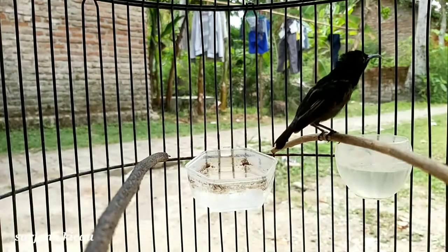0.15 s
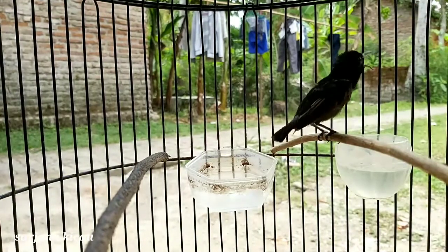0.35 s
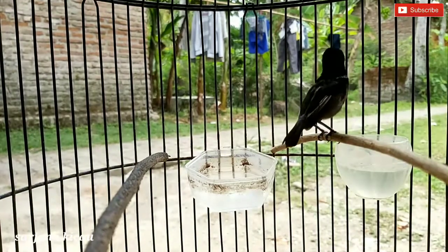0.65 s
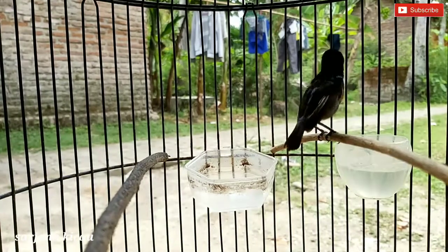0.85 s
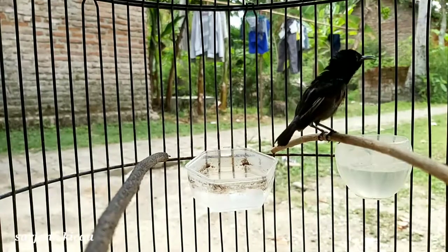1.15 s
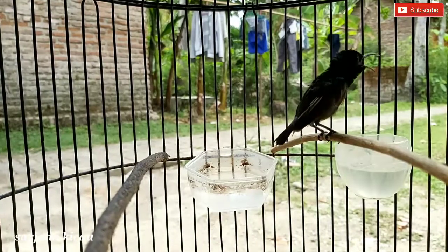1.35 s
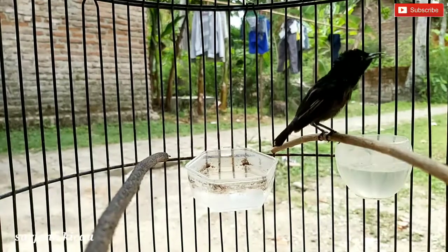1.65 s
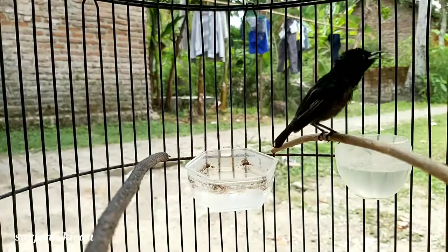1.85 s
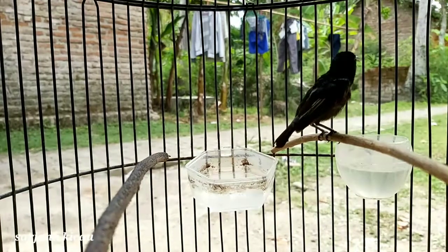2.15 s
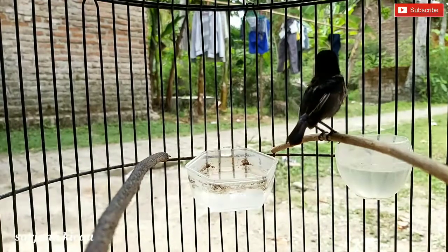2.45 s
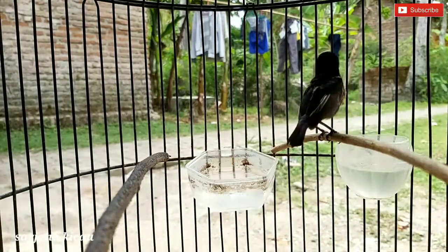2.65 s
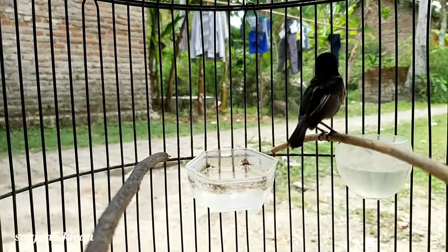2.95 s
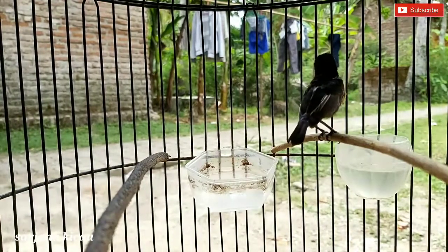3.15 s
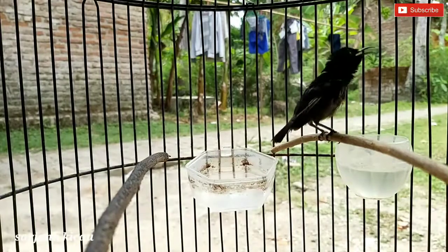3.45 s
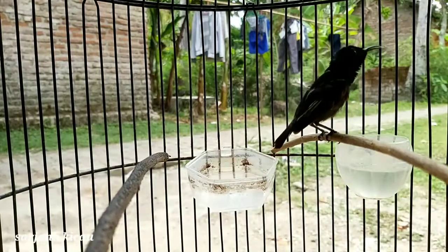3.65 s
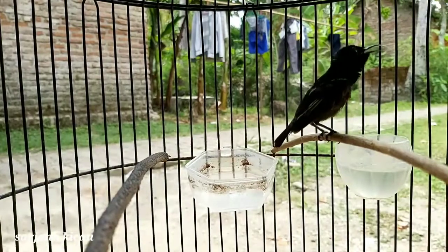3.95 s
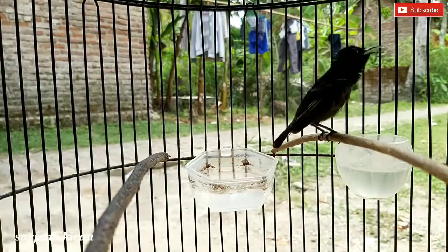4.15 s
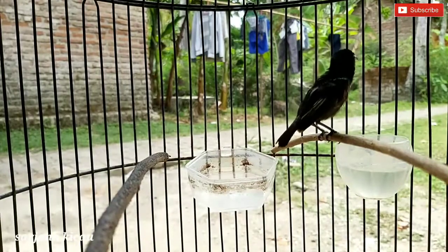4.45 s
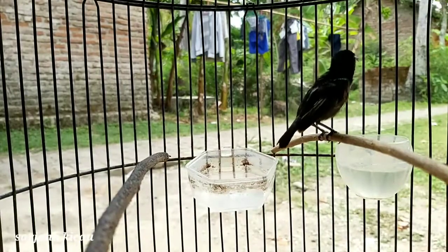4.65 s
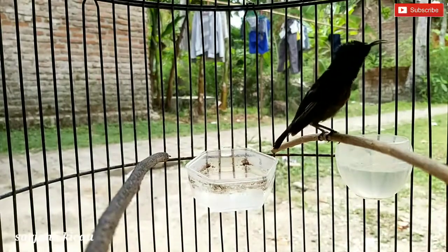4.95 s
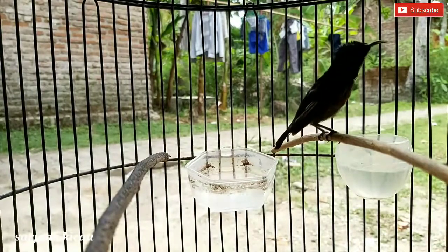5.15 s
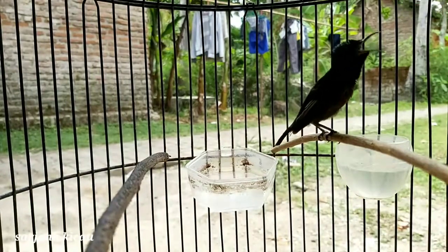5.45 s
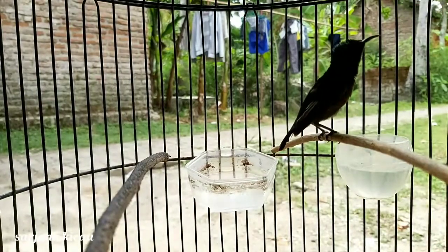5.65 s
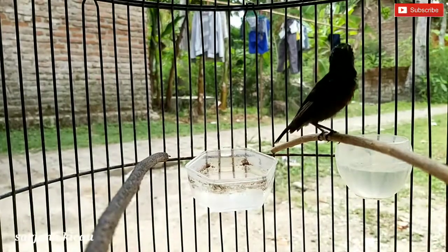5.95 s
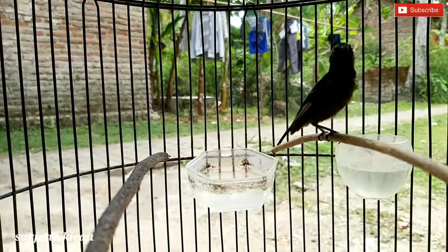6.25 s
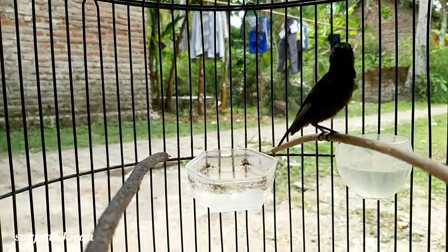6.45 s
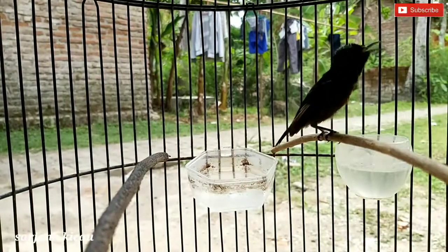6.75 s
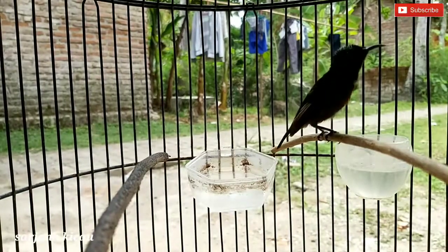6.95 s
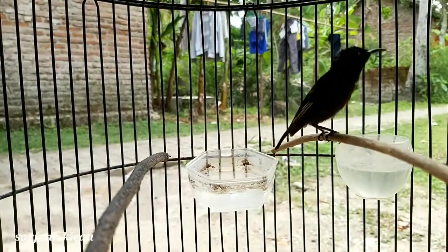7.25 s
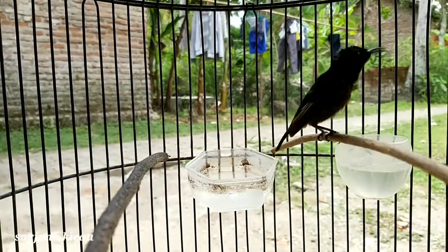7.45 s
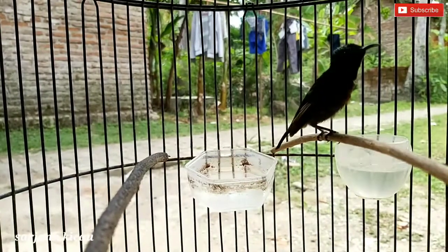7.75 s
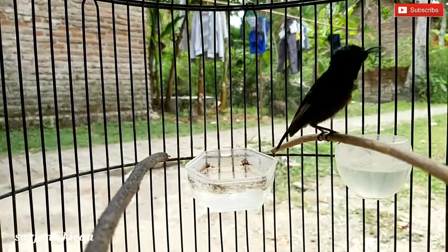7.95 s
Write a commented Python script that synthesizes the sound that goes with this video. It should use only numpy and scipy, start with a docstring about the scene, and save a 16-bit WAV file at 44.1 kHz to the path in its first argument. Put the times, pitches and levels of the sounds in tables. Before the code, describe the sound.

A small caged bird sings close to the microphone in a quiet yard. It gives a run of short, sharp, high chirps, breaks into a long rapid trill of falling notes, then returns to more widely spaced chirps. A soft low thud comes with most chirps, and the song has a slight echo. A faint low hum and very faint distant birds lie behind it.

```python
"""Caged bird in a yard

A small bird sings close to a two-port microphone beside a brick wall: single steady whistles, a long
trill of falling notes, more whistles, one last falling note. A soft tick and thud go with each whistle.
Cage, wall and trees echo the song. Behind it: a wavering low hum, rumble, rustle, hiss, far chirps."""
import sys
import numpy as np
from scipy import signal
from scipy.io import wavfile
from scipy.ndimage import uniform_filter1d, minimum_filter1d

SR = 44100
rng = np.random.default_rng(int(sys.argv[2]) if len(sys.argv) > 2 else 0)


def dump(signal):
    """Clip the signal to [-1, 1] and save it as 16-bit WAV at the path in sys.argv[1]."""
    limited = np.clip(np.atleast_2d(signal).T, -1, 1)
    pcm = np.round(limited * 32767).astype(np.int16)
    wavfile.write(sys.argv[1], SR, pcm)


N = 358091

# whistles: (start [s], length [s], pitch [Hz], left [dB], right [dB], left lag [us],
# relative tick [dB], relative thud [dB])
WHISTLES = [(-0.12, 0.053, 6270, -5.5, -6.5, 114, -48, -34),
            (0.3917, 0.054, 6280, -10, -7, 37, -52.5, -34.5), (0.7882, 0.043, 6310, -7.5, -6, 95, -53, -33),
            (1.12, 0.054, 6234, -7.5, -11.5, 73, -72, -48),
            (1.3939, 0.049, 6344, -11, -6.5, 43, -79, -36.5),
            (1.653, 0.046, 6310, -7.5, -6, 32, -56, -33.5),
            (1.9232, 0.051, 6345, -10.5, -7.5, 81.4, -61.5, -32),
            (2.2298, 0.042, 3833, -17.5, -18, 63, -80, -70),
            (2.5281, 0.047, 6263, -7.5, -13, 93, -59.5, -46),
            (5.485, .049, 6210, -11, -6.5, 53, -46, -41.5), (5.8984, 0.045, 6206, -9.5, -6, 57, -50, -42),
            (6.7616, .05, 6270, -5, -7.5, 46, -50.5, -35.5),
            (7.1547, 0.043, 6290, -9.5, -6, 39.4, -43, -37), (7.536, 0.048, 6296, -10.5, -7, 40, -69, -33)]
# octave of a full-scale whistle, rows left and right: (level [dB])
OCTAVE_DB = [
    [-20.5],
    [-7],
]
# echoes off cage floor, cups, ground: (left delay [ms], right delay [ms], left [dB], right [dB])
NEAR_ECHOES = [(1.6, 3.1, -12.5, -5.5), (4.7, 8.3, -20, -14.5), (8.9, 4.6, -20, -14.5)]
# diffuse tails: (t60 [s], level [dB], low-pass [Hz])
YARD_TAILS = [(0.13, -13, 12000), (.4, -21, 5000)]
# hum envelope: (time [s], level [dB])
HUM_LEVELS = [(0.0, -47.5), (0.41, -65.5), (0.65, -54), (0.95, -64), (1.79, -58), (2.17, -70), (2.53, -53),
              (2.89, -68.5), (3.57, -52), (4.27, -56), (5.15, -64.5), (5.9, -56), (6.65, -63.5),
              (8.12, -59.5)]
# hum resonances: (centre [Hz], width [Hz], relative level [dB])
HUM_MODES = [(100.6, 14, 3), (152.6, 8.9, -13.5), (286.6, 39, -16.5)]
# yard noise envelopes: (time [s], relative rumble [dB], relative rustle [dB])
AIR_LEVELS = [(0.0, -67, -77.5), (0.54, -72.5, -81.5), (3.19, -74.5, -83), (3.48, -68.5, -74.5),
              (6.85, -72.5, -85.5), (8.12, -72.5, -84.5)]
# noise spectra: (frequency [Hz], relative density [dB])
RUMBLE_SPECTRUM = [(15, -51), (25, -15.5), (102, -8), (125, -17.5), (188, -21), (274, -19.5), (800, -54),
                   (1040, -85), (1760, -120)]
RUSTLE_SPECTRUM = [(400, -6), (900, -10), (1600, -9), (2600, -15), (3600, -32)]
HISS_SPECTRUM = [(2000, -12.5), (3200, -7), (4300, -6.5), (5400, -9.5), (7200, -0.5), (11000, -17.5),
                 (16000, -27.5)]
# noise likeness between ports: (frequency [Hz], correlation [ratio])
CORRELATION = [(60, 1), (240, 0.071), (950, 0.015), (3770, 0.13), (15000, 0.39)]
# noise balance: (frequency [Hz], left minus right [dB])
BALANCE = [(60, 11.5), (120, -7.5), (300, -2), (1000, 0.5)]
# far trills: (start [s], end [s], first gap [s], steady gap [s])
FAR_TRILLS = [(.07, 1.6, .0845, .0845), (2.46, 5.1, .175, .086), (5.8, 8.1, .32, .0858)]
# one per far trill: (level [dB])
FAR_DB = [-69.5, -70, -68.5]
# bands of a far chirp: (centre [Hz], width [Hz], delay [s], t60 [s], relative level [dB])
FAR_BANDS = [(6830, 140, -.008, .15, -3), (4330, 520, 0, .42, 0), (6830, 140, .047, .15, -4)]
# faint swells: (start [s], length [s], centre [Hz], width [Hz], level [dB])
SWELLS = [(5.3, .25, 2000, 50, -78), (.15, .14, 2250, 60, -76), (.14, .15, 3800, 6800, -66),
          (.44, .13, 2000, 3200, -68), (6.553, .11, 4200, 900, -62)]
# trill notes: (mid-fall [s], lead-in [s], top pitch [Hz], top left [dB], top right [dB])
TRILL_NOTES = [(3.1084, 0.021, 5324, -16, -18), (3.181, 0.016, 5366, -10.5, -15.5),
               (3.261, 0.021, 5340, -13, -13), (3.3436, 0.022, 5360, -11.5, -12.5),
               (3.4285, .02, 5350, -16.5, -19), (3.5115, 0.025, 5450, -10, -10.5),
               (3.596, 0.02, 5330, -9.5, -5), (3.6836, .022, 5470, -15.5, -3.5),
               (3.7722, 0.021, 5590, -28, -5), (3.8636, 0.023, 5385, -10, -4.5),
               (3.95, 0.018, 5435, -17, -8.5), (4.034, 0.02, 5210, -6.5, -5.5),
               (4.122, 0.02, 5400, -13, -8), (4.212, 0.019, 5530, -17, -5), (4.304, .019, 5340, -9, -10.5),
               (4.3964, 0.021, 5470, -7.5, -10), (4.4925, .021, 5150, -12, -11),
               (4.582, 0.02, 5370, -17, -11.5), (4.679, 0.019, 5510, -16.5, -10),
               (4.7721, 0.022, 5380, -18.5, -16), (4.8746, 0.023, 5350, -13.5, -12.5),
               (4.9628, 0.021, 5310, -10.5, -5), (5.059, 0.018, 5456, -17.5, -10.5),
               (8.0772, 0.022, 5414, -24.5, -12)]
# trill note's pitch path: (place [-1 start, 0 mid-fall, 1 end], height [0 bottom, 1 top])
FALL_PATH = [(-1, .86), (-.8, .96), (-.6, 1.0), (-.4, .94), (-.22, .78), (0, .38), (.12, .2), (.35, .09),
             (1, -.04)]
# trill overtones at the usual note level: (multiple, left [dB], right [dB])
TRILL_OVERTONES = [(2, -42, -38), (3, -53, -43), (4, -51, -46)]

LEAD = SR // 4   # samples ahead of time zero


def amp(db):
    """Decibels to gain."""
    return 10 ** (np.asarray(db, float) / 20)


def unit_rms(x):
    """Scale to rms 1."""
    return x / np.sqrt(np.mean(x ** 2) + 1e-20)


def in_time(rows):
    """Columns of an envelope table, per sample."""
    times_s, *columns = np.transpose(rows)
    return [np.interp(np.arange(N) / SR, times_s, column) for column in columns]


def at_hz(rows, hz):
    """Table value on a log frequency axis."""
    knots_hz, values = np.transpose(rows)
    return np.interp(np.log(hz), np.log(knots_hz), values)


def drift(rate_hz, size=N):
    """Smooth random curve, spread of order 1."""
    knots = rng.standard_normal(int(size / SR * rate_hz) + 2)
    line = np.interp(np.arange(size) / SR * rate_hz, np.arange(len(knots)), knots)
    return 2.09 * uniform_filter1d(line, max(int(SR / rate_hz), 1))


def butter(x, hz, kind):
    """Second-order Butterworth filter."""
    return signal.sosfilt(signal.butter(2, hz, kind, fs=SR, output="sos"), x)


def noise_band(shape, hz, width_hz):
    """Band-passed white noise."""
    return butter(rng.standard_normal(shape), [hz - width_hz / 2, hz + width_hz / 2], "band")


def fades(t, length_s, rise_s, fall_s):
    """Sine-squared rise and fall."""
    rise, fall = np.sin(np.pi / 2 * np.clip([t / rise_s, (length_s - t) / fall_s], 0, 1)) ** 2
    return rise * fall


def bump(t, centre_s, width_s):
    """Gaussian pulse."""
    return np.exp(-((t - centre_s) / width_s) ** 2)


def add(track, start_s, sound):
    """Mix into a track that starts LEAD samples early."""
    at = round(start_s * SR) + LEAD
    track[:, at:at + sound.shape[1]] += sound[:, :track.shape[1] - at]


def whistle(length_s, hz, left_db, right_db, lag_us):
    """Nearly pure tone: starts sharp and soft, throbs, sags at the end; air rasps at both ends."""
    t = np.arange(round((length_s + .0023) * SR)) / SR
    n, is_high = len(t), hz > 5000
    sharp_hz = (90 if is_high else 450) * np.exp(-t / .012)
    sag = 1 - .075 * np.clip((t - length_s + .0029) / .0044, 0, 1) ** 2
    pitch_hz = (hz + sharp_hz) * sag * (1 + .0048 * drift(200, n))
    phase = 2 * np.pi * (np.cumsum(pitch_hz) / SR - pitch_hz * 1e-6 * np.array([[lag_us], [0]]))
    throb = np.array([drift(160, n), drift(160, n)])
    level = amp(np.array([[left_db], [right_db]]) - 6.5 * np.clip(1 - t / .0096, 0, 1))
    note = level * amp(2 * throb + .8 * drift(700, n)) * np.sin(phase)
    note += amp(OCTAVE_DB) * level ** 2 * amp(3 * throb + 1.3 * drift(600, n)) * np.cos(2 * phase)
    ends = bump(t, .011, .006) + .6 * bump(t, length_s - .007, .003) + .08
    ends *= amp(3 * drift(400, n))
    if is_high:   # strong-weak cycles give odd multiples of half the pitch
        note += ends * amp([[-50], [-46]]) * np.sin(.5 * phase)
        note += ends * amp([[-46], [-40]]) * np.sin(1.5 * phase)
        note += amp([[-50], [-48]]) * np.clip(t / .033, 0, 1) * amp(3.3 * throb) * np.sin(2.5 * phase)
    else:   # even cycles: fluttering onset, higher overtones, air
        note *= amp(6 * drift(500, n) * np.clip(1.5 - t / .012, 0, 1))
        note += amp(-51 + 2.5 * throb) * (np.sin(3 * phase) + np.sin(4 * phase))
        note += amp(-48) * noise_band((2, n), 8200, 9500)
    rasp = np.exp(-t / .005) + .1 * bump(t, length_s - .004, .003)
    note += amp(-10) * level.max() * rasp * noise_band((2, n), hz, 2900)
    return note * fades(t, length_s + .003, rise_s=.011, fall_s=.007)


def tick_and_thud(length_s, tick_db, thud_db):
    """A soft tick, then a low thud with each whistle, mostly on the right."""
    t = np.arange(round(.12 * SR)) / SR
    tick = noise_band((2, len(t)), 480, 410) * bump(t, .008, .0045)
    burst = rng.standard_normal((2, len(t))) * fades(t - .012, length_s, rise_s=.0063, fall_s=.015)
    thud = np.array([unit_rms(channel) for channel in butter(burst, [30, 130], "band")])
    thud *= amp([[min(thud_db - 2.5, -50)], [thud_db - 4]])
    return thud + amp([[tick_db + 13.5], [tick_db + 20.5]]) * tick


def yard_echoes(song):
    """Close echoes make gliding notes beat; wall and trees return a duller, diffuse tail."""
    t = np.arange(round(.7 * SR)) / SR
    response = np.zeros((2, len(t)))
    for t60_s, db, cutoff_hz in YARD_TAILS:
        noise = butter(rng.standard_normal(response.shape), cutoff_hz, "low")
        response += noise * amp(db - 60 * t / t60_s) / np.sqrt(t60_s * SR / 14)
    response *= np.clip((t - .004) / .006, 0, 1)
    response[:, 0] = 1   # direct path
    for left_ms, right_ms, *db in NEAR_ECHOES:
        response[[0, 1], [round(left_ms * SR / 1000), round(right_ms * SR / 1000)]] += amp(db)
    return signal.fftconvolve(song, response, axes=1)[:, LEAD:LEAD + N]


def hum():
    """Noise in narrow low resonances, louder on the left."""
    modes = sum(amp(db) * unit_rms(noise_band(N, hz, width_hz)) for hz, width_hz, db in HUM_MODES)
    return amp(in_time(HUM_LEVELS)[0]) * modes * amp([[2.02], [-2.38]])


def shaped_noise(spectrum, flicker_db):
    """Stereo noise in flickering half-octave bands, rms 1."""
    out, edges_hz = 0, 22 * 2 ** np.arange(0, 9.6, .5)
    white = rng.standard_normal((2, 2, N))
    sides = np.array([[1], [-1]])
    for k, (low_hz, high_hz) in enumerate(zip(edges_hz, edges_hz[1:])):
        hz = np.sqrt(low_hz * high_hz)
        if spectrum[0][0] / 1.5 < hz < spectrum[-1][0] * 1.5:
            mid, side = butter(white[k % 2], [low_hz, high_hz], "band")
            alike = at_hz(CORRELATION, hz)
            gain = amp(at_hz(spectrum, hz) + flicker_db * drift(12) + at_hz(BALANCE, hz) / 2 * sides)
            out += gain * (np.sqrt(1 + alike) * mid + np.sqrt(1 - alike) * side * sides)
    return unit_rms(out)


def yard_noise():
    """Rumble and rustle rise and fall slowly under a faint hiss."""
    rumble_db, rustle_db = in_time(AIR_LEVELS)
    rumble = amp(rumble_db + 12.5) * shaped_noise(RUMBLE_SPECTRUM, flicker_db=2.5)
    rustle = amp(rustle_db + 6.5) * shaped_noise(RUSTLE_SPECTRUM, flicker_db=.5)
    hiss = amp(-75) * shaped_noise(HISS_SPECTRUM, flicker_db=-1)
    return rumble + rustle + hiss


def far_birds():
    """Distance smears chirps into dying noise bands; the first trill is even, the others speed up."""
    out, chirps = np.zeros((2, N)), []
    for (at_s, end_s, gap_s, steady_s), db in zip(FAR_TRILLS, FAR_DB):
        while at_s < end_s:
            chirps.append((at_s, db + 1.8 * rng.standard_normal()))
            at_s += gap_s
            gap_s = steady_s + .55 * (gap_s - steady_s)
    times_s, levels_db = np.transpose(chirps)
    for hz, width_hz, delay_s, t60_s, db in FAR_BANDS:
        hits = np.zeros(N + SR)
        hits[((times_s + delay_s) * SR).astype(int)] = amp(levels_db + db)
        decays = signal.lfilter([1], [1, -amp(-60 / (t60_s * SR))], hits[:N] + 1e-18)
        out += uniform_filter1d(decays, 400) * unit_rms(noise_band((2, N), hz, width_hz))
    return out


def faint_swells():
    """Noise bands swell and fade: two thin tones, two soft rustles, one far chirp."""
    out = np.zeros((2, N + LEAD))
    for start_s, length_s, hz, width_hz, db in SWELLS:
        t = np.arange(round(length_s * SR)) / SR
        noise = unit_rms(noise_band((2, SR // 2), hz, width_hz))[:, -len(t):]
        add(out, start_s, amp(db) * fades(t, length_s, rise_s=.02, fall_s=.05) * noise)
    return out[:, LEAD:]


def trill_note(before_s, top_hz, left_db, right_db, cold, after_s=.024):
    """Holds high, falls fast, holds low; a cold note's fall is shallower and softer."""
    t = np.arange(-round(before_s * SR), round(after_s * SR)) / SR
    n = len(t)
    bottom_hz, bottom_db = 3270 + 352 * cold, -19.5 - 2 * cold
    place = np.where(t < 0, t / before_s, t / after_s)
    height = uniform_filter1d(np.interp(place, *np.transpose(FALL_PATH)), 60)
    jitter = 1 + .011 * np.clip(height, .3, 1) * drift(311, n)
    pitch_hz = (bottom_hz + (top_hz - bottom_hz) * height) * jitter
    # head turns right: right port louder, left lags more
    lag_us = (140.4 + 7 * right_db) * np.clip(height, 0, 1)
    phase = 2 * np.pi * (np.cumsum(pitch_hz) / SR - pitch_hz * 1e-6 * lag_us * [[1], [0]])
    marks_s = [-before_s, -.012, -.005, -.001, .003, after_s]
    stages_db = [(left_db, -7.5 - 2 * cold, bottom_db - 3.5), (right_db, right_db - 10.5, bottom_db)]
    level = amp([np.interp(t, marks_s, [top - 12, top + .5, fall + .12, fall - 2.5, low + .5, low - 3])
                 for top, fall, low in stages_db])
    level *= amp(3 * np.clip(height, .15, 1) * drift(450, n))   # high part flutters
    note = level * np.sin(phase)
    brightness = amp(.6 * (right_db + 8.5))   # follows the right port's level
    for k, *overtone_db in TRILL_OVERTONES:
        gain = brightness * amp(np.vstack(overtone_db) + 2.7 * drift(270, n))
        note += gain * np.sin(k * phase) * np.clip((15200 - k * pitch_hz) / 600, 0, 1)
    high_air = brightness * amp(-41) * np.clip((t + .018) / .012, 0, 1) * noise_band((2, n), 8300, 9500)
    low_air = amp(-44) * level * noise_band((2, n), 1900, 1700)
    return (note + high_air + low_air) * fades(t + before_s, before_s + after_s, rise_s=.003, fall_s=.004)


def trill(pause_s=.5):
    """Falling notes; the voice starts cold after a pause and warms up note by note."""
    song = np.zeros((2, N + LEAD))
    cold, last_s = 1, 0
    for at_s, before_s, top_hz, left_db, right_db in TRILL_NOTES:
        cold = 1 if at_s - last_s > pause_s else .29 * cold
        add(song, at_s - before_s, trill_note(before_s, top_hz, left_db, right_db, cold))
        last_s = at_s
    return song


def scene():
    """Echoed song, dry ticks and thuds, background."""
    whistles, thuds = np.zeros((2, 2, N + LEAD))
    for start_s, length_s, hz, left_db, right_db, lag_us, tick_db, thud_db in WHISTLES:
        add(whistles, start_s - .001, whistle(length_s, hz, left_db, right_db, lag_us))
        add(thuds, start_s, tick_and_thud(length_s, tick_db, thud_db))
    air = yard_noise()
    song = yard_echoes(whistles + trill())
    return song + thuds[:, LEAD:] + hum() + air + far_birds() + faint_swells()


def record(dry, bass_hz=42, ceiling=.86, top_hz=16800):
    """Bass roll-off, fast peak limiter, steep low-pass."""
    dry = butter(dry, bass_hz, "high")
    gain = minimum_filter1d(np.minimum(1, ceiling / (abs(dry) + 1e-9)), 200)
    limited = dry * uniform_filter1d(gain, 200)
    return signal.sosfilt(signal.cheby2(12, 70, top_hz, fs=SR, output="sos"), limited)


dry = scene()
out = record(dry)
dump(out)
```